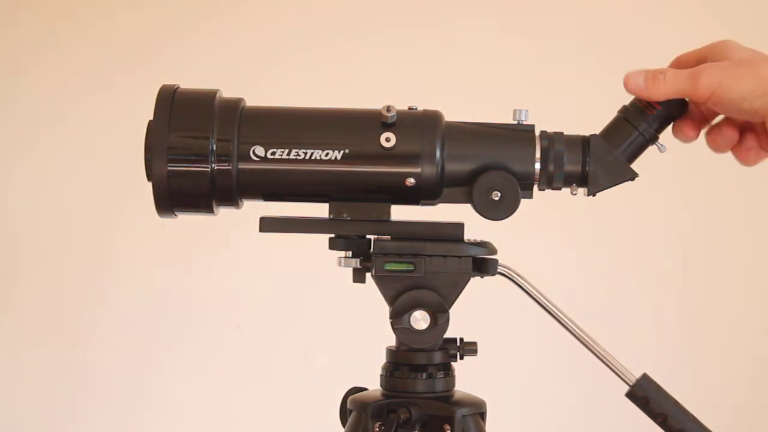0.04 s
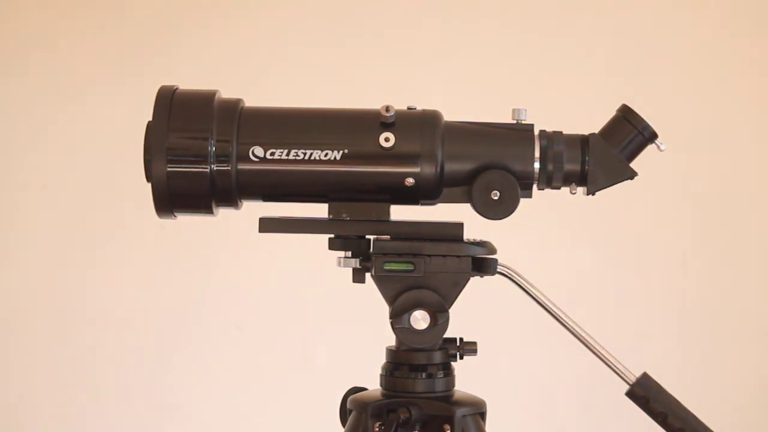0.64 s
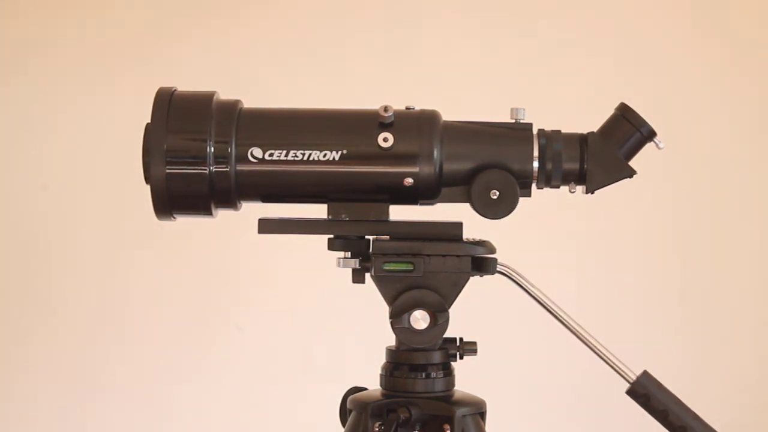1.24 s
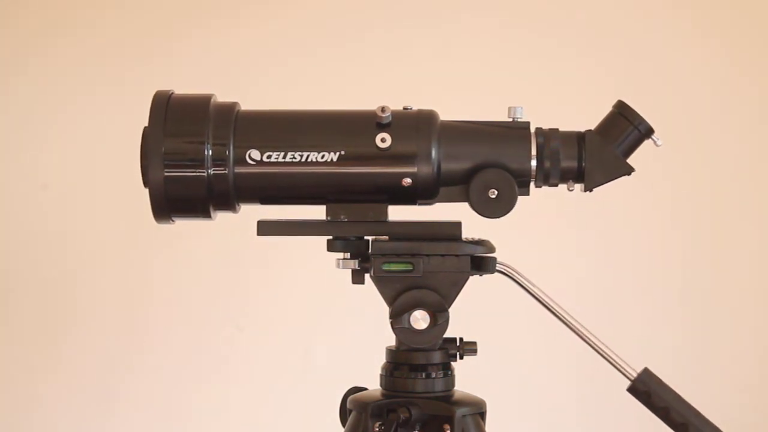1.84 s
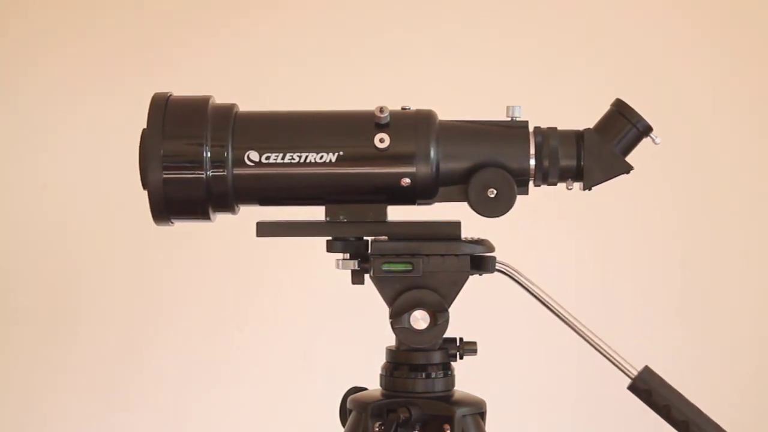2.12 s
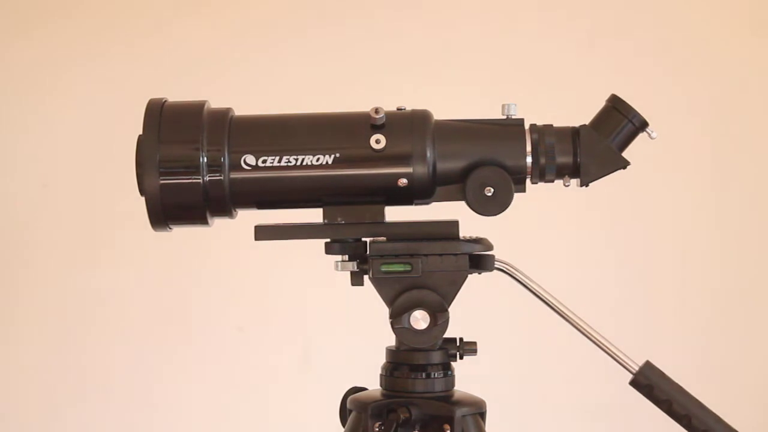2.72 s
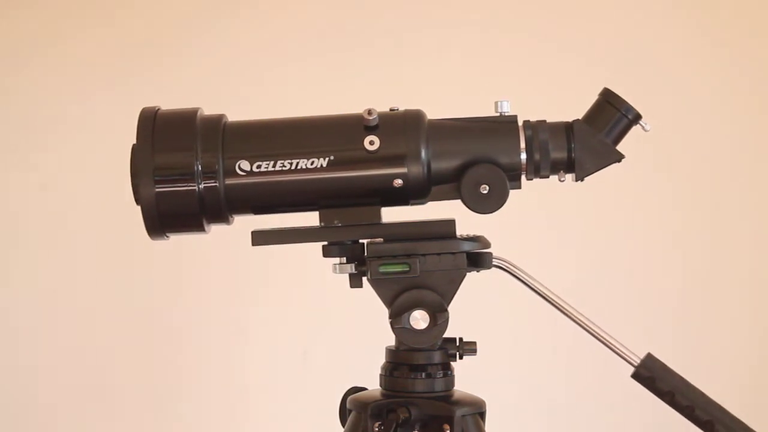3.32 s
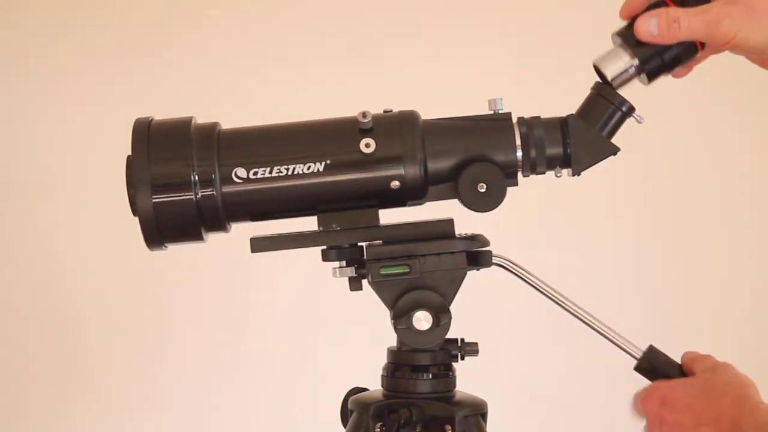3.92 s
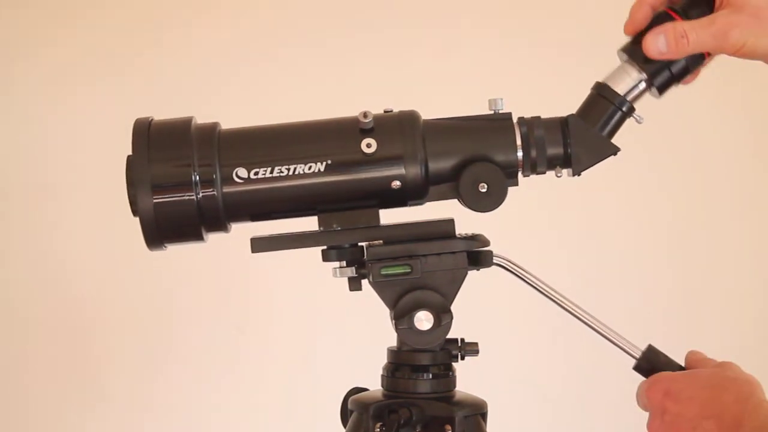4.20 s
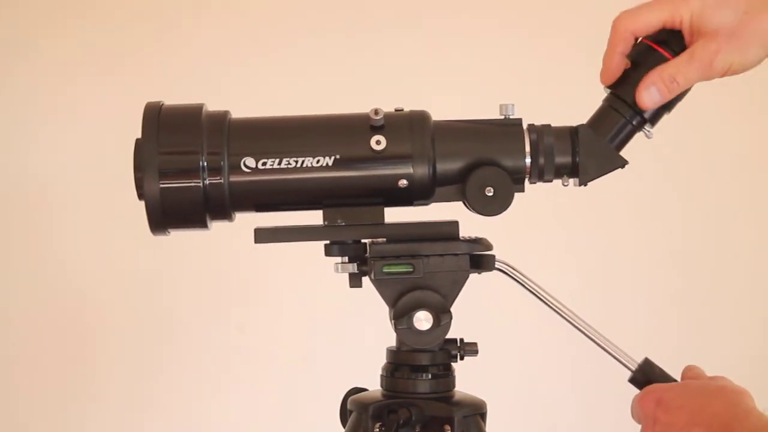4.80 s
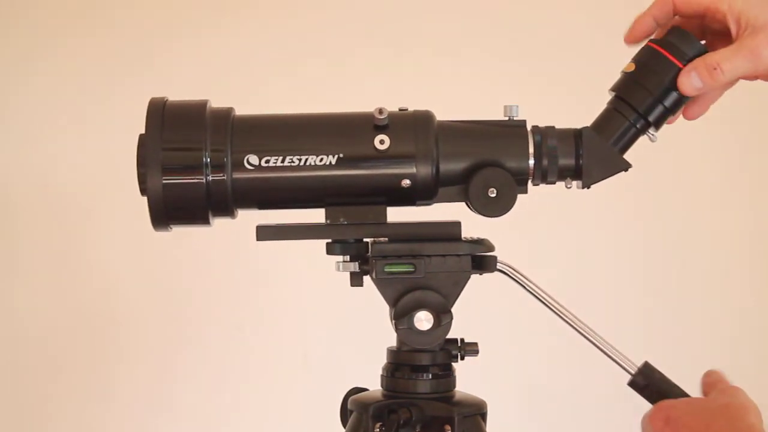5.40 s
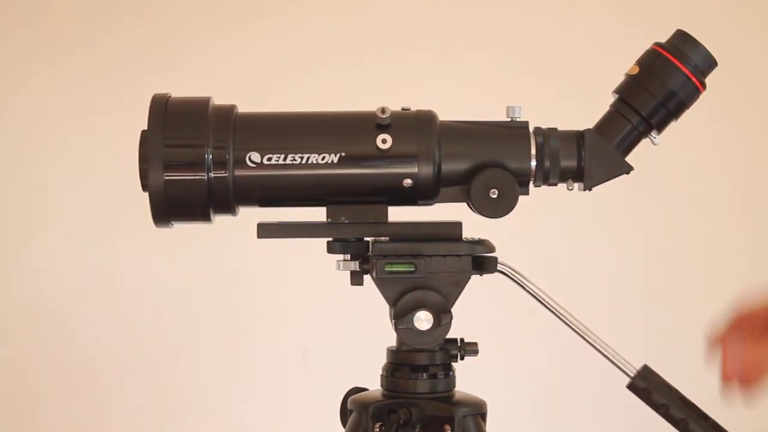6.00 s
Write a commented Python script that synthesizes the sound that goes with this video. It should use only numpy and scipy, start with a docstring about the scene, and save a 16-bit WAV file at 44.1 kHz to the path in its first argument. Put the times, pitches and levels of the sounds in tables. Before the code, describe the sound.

A metal eyepiece pings out of a small telescope, knocks sound on a table, a cap snaps off, and another eyepiece clacks in.

```python
"""An eyepiece is swapped on a small spotting scope in a bare, quiet room.
The old one zips out of its holder, grooves rubbing the rim, pings free and is set on a table.
The new one knocks on the table; its plastic cap is gripped, dragged and snaps off.
A hand takes the tripod handle, then the new barrel taps the rim, slides in and seats with a clack.
A sleeve and fingers rustle in between, over steady hiss and hum."""
import sys
import numpy as np
from scipy import signal
from scipy.fft import rfft, irfft
from scipy.io import wavfile
from scipy.ndimage import uniform_filter1d

SR = 44100
rng = np.random.default_rng(int(sys.argv[2]) if len(sys.argv) > 2 else 0)


def bounce(signal):
    """Save signal as a 16-bit WAV file at the path given by the first command-line argument."""
    frames = np.transpose(np.atleast_2d(signal))
    limited = np.clip(frames, -1, 1)
    pcm = np.round(limited * 32767).astype(np.int16)
    wavfile.write(sys.argv[1], SR, pcm)


N = 266849
TIME_S = np.arange(N) / SR
AGE_S = TIME_S[:SR // 2]   # time axis of an impulse response
CUTOFF_HZ = 15900


# Slide: start and end in seconds, first and last groove rate in Hz, full-speed level in dB.
PULL_SLIDE = (.243, .368, 1150, 5400, -52.5)
# Strokes. Each row: peak time in seconds, length in seconds, peak level in dB.
BARREL_STROKES = [(.346, 0.07, -54), (.364, 0.024, -43.5)]
# Contacts. Each row: start in seconds, level in dB, brightness in Hz.
PING_HITS = [(.364, -14.5, 15000)]
RELEASE_HITS = [(.368, -23, 3000), (.373, -13.5, 2500)]
# Spectra. Each row: frequency in Hz, relative gain in dB.
BARREL_EQ = [(1500, -5), (1900, -5), (2600, -8), (4300, -3), (5200, -13), (6150, 1), (7500, -10),
             (9000, -13), (10400, -6), (11800, -23.8), (15000, -28)]
RELEASE_EQ = [(120, -30), (200, -13), (395, -13), (463, -14), (1060, -17), (1500, -32), (1780, -21),
              (3000, -34), (3900, -57), (6600, -120)]
# Modes. Each row: frequency in Hz, relative level in dB, T60 in seconds.
BARREL_RING = [(1860, -10, .2), (3354, -9, .2), (4210, -5, .22), (4393, -3, .22), (6083, 0, .26),
               (6170, -4, .22), (6616, -14, .3), (9679, -10, .17), (9792, -12, .15), (10720, -7, .2)]
HOLDER_RING = [(280, -5, 0.14), (408, -2, 0.12), (512, 4, 0.13), (924, -2, .15)]

def pull_out():
    """The old barrel rubs out of the holder and pings as it comes free with a small pop."""
    slide = groove_zip(PULL_SLIDE, hiss_db=-5.5, db_per_doubling=2)
    rub = through(friction(BARREL_STROKES, grit_db=3), body(BARREL_EQ, crack_db=0, crack_s=0.0017))
    ping = ringing(PING_HITS, BARREL_RING)
    pop = strike(RELEASE_HITS, RELEASE_EQ, crack_db=-0.65, crack_s=0.0026, modes=HOLDER_RING, ring_db=0)
    return slide + rub + ping + pop


# Contacts. Each row: start in seconds, level in dB, brightness in Hz.
SET_DOWN_HITS = [(1.3475, -2.5, 12000), (1.3507, 0, 12000), (1.3565, 6, 14000), (1.368, 0.5, 1200)]
# Spectrum. Each row: frequency in Hz, relative gain in dB.
SET_DOWN_EQ = [(70, -21), (160, -7.5), (220, -1.5), (400, -7), (600, -4), (1000, -7.5), (1300, -11),
               (2100, -12), (2900, -8), (5400, -10.5), (6700, -26.5), (8000, -20.5), (9000, -37),
               (16000, -44)]
# Modes. Each row: frequency in Hz, relative level in dB, T60 in seconds.
SET_DOWN_RING = [(169, -2.9, 0.25), (237, -0.2, 0.26), (408, -2.5, 0.23), (497, -8.9, 0.31),
                 (551, -5.7, 0.23), (580, -4.3, 0.21), (639, -3.6, 0.18), (909, -7.6, 0.29),
                 (1075, -10.1, 0.32), (1428, -13.6, 0.36), (2489, -11.5, 0.28), (2544, -9.6, 0.28),
                 (2696, -14.2, 0.33), (2857, -12.6, 0.36), (3062, -7.5, 0.35), (3249, -13.3, 0.34),
                 (3626, -10.9, 0.3), (3982, -11.8, 0.19), (4328, -12.4, 0.22), (5215, -12.0, 0.25),
                 (5524, -12.0, 0.2)]

def set_down():
    """The old eyepiece clatters onto the table; eyepiece, table and room ring."""
    clatter = strike(SET_DOWN_HITS, SET_DOWN_EQ, crack_db=-0.31, crack_s=0.0038)
    return clatter + from_db(-2.5) * ringing(SET_DOWN_HITS, SET_DOWN_RING)


# Contacts. Each row: start in seconds, level in dB, brightness in Hz.
NUDGE_HITS = [(1.5805, -8, 6000), (1.584, -14.5, 5000)]
TICK_HITS = [(1.7045, -15, 15000)]
KNOCK_HITS = [(1.722, -3, 6000), (1.724, 6, 3500), (1.7255, 12.2, 9000), (1.7355, 8, 9000)]
# Spectra. Each row: frequency in Hz, relative gain in dB.
NUDGE_EQ = [(300, -5.5), (600, -3.5), (900, -1), (1600, 1.5), (2400, -4.5), (3500, -13), (4500, -27.9),
            (6000, -28)]
TICK_EQ = [(1500, -17), (3100, 4), (4200, -3), (5500, -23), (7700, -11), (8700, -24), (9900, -7),
           (13000, -20)]
KNOCK_EQ = [(60, -24), (100, -22), (160, -4.5), (300, -2.5), (450, -0.3), (700, -1.5), (1200, 1),
            (1900, -6), (2300, -10), (3300, -15), (5000, -29), (8500, -33), (10000, -31.5), (14500, -45)]
# Modes. Each row: frequency in Hz, relative level in dB, T60 in seconds.
TABLE_AND_ROOM_RING = [(167, -13.3, 0.21), (271, -8.6, 0.29), (399, -3.5, 0.18), (469, -12.2, 0.26),
                       (497, -8.9, 0.31), (578, -6.5, 0.35), (621, -3.4, 0.28), (681, -3.2, 0.21),
                       (746, -3.9, 0.3), (866, -12.4, 0.27), (1014, -1.5, 0.22), (1037, -8.8, 0.24),
                       (1110, -13.9, 0.31), (1152, -4.8, 0.24), (1174, -0.2, 0.26), (1211, -3.1, 0.25),
                       (1293, -2.7, 0.29), (1427, -12.6, 0.36), (1494, -13.7, 0.3), (1596, -14.6, 0.36),
                       (1619, -13.6, 0.36), (1686, -12.8, 0.3), (1742, -10.7, 0.23), (1773, -12.9, 0.31),
                       (1837, -15.6, 0.36), (1882, -6.8, 0.19), (2050, -12.6, 0.23), (2624, -17.3, 0.34)]

def table_knock():
    """The new eyepiece is nudged, ticks and knocks; the table top radiates the blow ahead of the room."""
    nudge = strike(NUDGE_HITS, NUDGE_EQ, crack_db=-21, crack_s=0.003)
    tick = strike(TICK_HITS, TICK_EQ, crack_db=-9, crack_s=0.0023)
    knock = from_db(0.5) * strike(KNOCK_HITS, KNOCK_EQ, crack_db=-21, crack_s=0.0033)
    direct = from_db(-3.5) * through(blows(KNOCK_HITS), colour(KNOCK_EQ))
    table_and_room = from_db(2.5) * ringing(KNOCK_HITS, TABLE_AND_ROOM_RING)
    return nudge + tick + knock + direct + table_and_room


# Strokes. Each row: peak time in seconds, length in seconds, peak level in dB.
GRIP_STROKES = [(2.1, 0.062, -46), (2.255, 0.057, -56.5), (2.412, .022, -44.5)]
DRAG_STROKES = [(2.43, 0.026, -29), (2.455, 0.03, -25.5)]
# Contact. Each row: start in seconds, level in dB, brightness in Hz.
SNAP_HITS = [(2.447, -4.5, 12000)]
# Spectra. Each row: frequency in Hz, relative gain in dB.
GRIP_EQ = [(600, -6), (1550, -4), (2300, -12), (2900, -8), (3400, -16), (4000, -1), (4900, -24), (6500, -7),
           (7200, -15), (8200, -8), (10500, -25), (12500, -19), (15000, -34)]
CAP_EQ = [(300, -23), (700, -11), (1100, -13.5), (1500, -4), (2200, -7), (2650, 0.5), (3600, -8),
          (4600, -15.5), (7500, -16.5), (9000, -25), (10300, -43), (11800, -31), (16000, -51)]
# Modes. Each row: frequency in Hz, relative level in dB, T60 in seconds.
CAP_RING = [(1529, -6, .26), (1755, -9, .35), (2455, -1, .39), (2590, 1, .38), (2660, -2, .36),
            (2799, -3, .42), (5776, -16, .3), (7623, -16, .23)]

def cap_off():
    """The plastic cap is gripped, dragged and snaps off, ringing."""
    grip = through(friction(GRIP_STROKES, grit_db=7), body(GRIP_EQ, crack_db=-2.5, crack_s=0.0017))
    force = friction(DRAG_STROKES, grit_db=6.5) + blows(SNAP_HITS)
    cap = body(CAP_EQ, crack_db=-0.28, crack_s=0.0029, modes=CAP_RING, ring_db=-13.5)
    return grip + through(force, cap)


# Slide: start and end in seconds, first and last groove rate in Hz, full-speed level in dB.
PUSH_SLIDE = (4.706, 4.772, 1400, 11300, -42)
# Contacts. Each row: start in seconds, level in dB, brightness in Hz.
HANDLE_HITS = [(3.914, -15, 12000), (3.918, -4, 15000)]
RIM_HITS = [(4.2385, -17, 12000), (4.2475, -3, 15000)]
SEAT_HITS = [(4.139, -16.5, 9200), (4.142, -20.5, 12000), (4.7732, -0.5, 15000), (4.7797, 9.5, 13000)]
# Spectra. Each row: frequency in Hz, relative gain in dB.
HANDLE_EQ = [(100, -40), (170, -26), (218, 4), (371, -20), (440, -4.5), (793, -1), (889, -1), (1080, -4.5),
             (1830, -4), (3180, -7.5), (6300, -5.5), (12300, -16), (16000, -32)]
RIM_EQ = [(300, -21), (450, -9.5), (800, -3), (1300, -10), (1900, -7), (2700, -11), (3900, -3),
          (5400, -17.5), (6500, 2.5), (7400, -6.5), (8700, -15.5), (10600, -12), (12500, -25.8),
          (16000, -27)]
SEAT_EQ = [(130, -16), (260, -10), (440, -2), (600, -7.5), (1100, -0.5), (1800, -0.5), (2800, -3),
           (4500, -4.5), (7500, -6), (11000, -12), (14000, -16), (16000, -27)]
# Modes. Each row: frequency in Hz, relative level in dB, T60 in seconds.
RIM_RING = [(3430, -14, 0.36), (3820, -10, 0.17), (6444, -15, 0.36), (7200, -2, 0.12), (7900, -12, 0.1),
            (10100, -10, 0.12)]
SCOPE_RING = [(436, 0.1, 0.25), (1016, -1.7, 0.18), (1294, -2.4, 0.22), (1683, -1.6, 0.23),
              (1826, -2.8, 0.24), (1902, -4.7, 0.24), (1945, -5.1, 0.26), (1980, -6.0, 0.25),
              (2355, -6.0, 0.31), (2417, -8.1, 0.26), (2790, -2.4, 0.22), (2826, -8.2, 0.33),
              (3273, -7.8, 0.3), (3310, -6.1, 0.2), (3554, -6.4, 0.22), (3939, -2.9, 0.24),
              (4681, -8.7, 0.23), (5089, -4.3, 0.17)]

def push_in():
    """The tripod handle clicks; the new barrel taps the rim, slides in and seats, ringing the scope."""
    handle = strike(HANDLE_HITS, HANDLE_EQ, crack_db=1, crack_s=0.011)
    rim = strike(RIM_HITS, RIM_EQ, crack_db=1.7, crack_s=0.0032, modes=RIM_RING, ring_db=-12)
    slide = groove_zip(PUSH_SLIDE, hiss_db=0, db_per_doubling=6)
    clack = strike(SEAT_HITS, SEAT_EQ, crack_db=1.8, crack_s=0.0087)
    scope = from_db(-11.5) * ringing(SEAT_HITS, SCOPE_RING)
    return handle + rim + slide + clack + scope


# Sliding hiss spectrum. Each row: frequency in Hz, relative gain in dB.
SLIDE_EQ = [(800, 2), (2000, 0), (7000, -1.5), (10500, -10), (15000, -22)]

def groove_zip(slide, hiss_db, db_per_doubling, fade_s=0.018):
    """Fine grooves on the barrel pass the rim; it speeds up steadily, so pitch and level rise."""
    start_s, end_s, first_hz, last_hz, db = slide
    rate_hz = np.interp(TIME_S, [start_s, end_s], [first_hz, last_hz])
    touching = np.clip(np.minimum(TIME_S - start_s, end_s - TIME_S) / fade_s, 0, 1)
    gain = touching * from_db(db + db_per_doubling * np.log2(rate_hz / last_hz))
    jittered_hz = rate_hz * (1 + 0.07 * waver(2500))
    grooves = gain * np.sin(2 * np.pi * np.cumsum(jittered_hz) / SR)
    hiss = from_db(hiss_db) * through(slipping(gain, grit_db=3), colour(SLIDE_EQ))
    room = unit_energy(signal.unit_impulse(len(AGE_S)) + room_tail())
    return through(grooves + hiss, room)


# Contacts. Each row: start in seconds, level in dB, brightness in Hz.
BUMP_HITS = [(2.875, -23.5, 900), (4.141, -17.5, 1510), (4.25, -19.5, 1500), (5.535, -27.5, 895)]
# Spectrum. Each row: frequency in Hz, relative gain in dB.
BUMP_EQ = [(120, -1), (210, 1), (450, 8), (700, 4), (2000, -62)]
# Modes. Each row: frequency in Hz, relative level in dB, T60 in seconds.
MOUNT_RING = [(208, 11.7, 0.2), (232, 3, 0.33), (437.3, 8.3, 0.27)]

def mount_bumps():
    """Soft bumps excite the low modes of the mount."""
    return strike(BUMP_HITS, BUMP_EQ, crack_db=-1, crack_s=0.0022, modes=MOUNT_RING, ring_db=1.5)


# Strokes. Each row: peak time in seconds, length in seconds, peak level in dB.
SLEEVE_STROKES = [(2.74, 0.2, -55.5), (2.86, 0.27, -56.5), (3.17, 0.59, -59.5), (3.35, .24, -63),
                  (3.75, 1, -61.5), (4.57, .36, -62.5), (5.92, 0.38, -63.5)]
FINGER_STROKES = [(.045, 0.048, -63), (.76, 0.42, -69), (2.7, 0.084, -59.5), (2.86, .3, -69),
                  (3.05, 0.083, -60.5), (3.57, 0.78, -66), (4.58, .08, -61)]
# Spectra. Each row: frequency in Hz, relative gain in dB.
SLEEVE_EQ = [(150, -13), (300, 1), (700, -2.5), (1500, 1.5), (3000, -7.5), (6000, -18.5), (12000, -42)]
FINGER_EQ = [(1000, -30), (3500, 2), (7000, 0), (12000, -10.5), (16000, -10)]

def hands():
    """A sleeve rustles and fingers shift on the housing."""
    sleeve_slips = friction(SLEEVE_STROKES, grit_db=6)
    finger_slips = friction(FINGER_STROKES, grit_db=6)
    sleeve = through(sleeve_slips, body(SLEEVE_EQ, crack_db=-7, crack_s=0.0022))
    fingers = through(finger_slips, body(FINGER_EQ, crack_db=0, crack_s=0.0037))
    return sleeve + fingers


def strike(hits, spectrum, **body_settings):
    """Contact pulses drive one object in the room."""
    return through(blows(hits), body(spectrum, **body_settings))


def blows(hits, size=256):
    """One force pulse per contact; softer contacts last longer and sound duller."""
    force = np.zeros(N)
    for start_s, db, bright_hz in hits:
        lowpass = signal.butter(2, bright_hz, fs=SR)
        start = round(start_s * SR)
        force[start:start + size] += from_db(db) * signal.lfilter(*lowpass, signal.unit_impulse(size))
    return force


def ringing(hits, modes):
    """The hardest contact sets the given modes ringing, of object or room."""
    hardest = max(hits, key=lambda hit: hit[1])
    return through(blows([hardest]), ring(modes))


def ring(modes, swell_s=0.00092):
    """Decaying sines that swell as the blow spreads."""
    sines = sum((-1) ** k * from_db(db - 60 * AGE_S / t60_s) * np.sin(2 * np.pi * hz * AGE_S)
                for k, (hz, db, t60_s) in enumerate(modes))
    return unit_energy(sines * (1 - np.exp(-AGE_S / swell_s)))


def body(spectrum, crack_db, crack_s, modes=None, ring_db=-6):
    """Response of an object in the room: a short crack, its reflections and any ringing modes."""
    crack = unit_energy(rng.standard_normal(len(AGE_S)) * np.exp(-AGE_S / crack_s))
    flat = evened(from_db(crack_db) * crack + room_tail())
    response = unit_energy(through(flat, colour(spectrum)))
    return unit_energy(response + from_db(ring_db) * ring(modes)) if modes else response


def friction(strokes, grit_db, rise_share=0.49):
    """Slips follow the pressure of each stroke, which builds to a peak and lets go."""
    corners = [-rise_share, 0, 1 - rise_share]
    pressure = sum(from_db(db) * np.interp((TIME_S - peak_s) / length_s, corners, [0, 1, 0])
                   for peak_s, length_s, db in strokes)
    return slipping(pressure, grit_db)


def slipping(gain, grit_db):
    """Countless tiny slips of uneven size."""
    slips = rng.standard_normal(N) * from_db(grit_db * np.tanh(waver(900)))
    return gain * slips / np.std(slips)


# Reverberation. Each row: frequency in Hz, T60 in seconds.
ROOM_DECAY = [(100, 0.25), (300, 0.36), (800, 0.32), (2000, 0.32), (5000, 0.27), (9000, 0.24),
              (15000, 0.13)]

def room_tail(build_s=0.0018, size=32768, bands=8):
    """Dense reflections that build up quickly and die band by band."""
    hz = np.fft.rfftfreq(size, 1 / SR)
    white = rfft(rng.standard_normal(size))
    centres_hz = np.geomspace(100, CUTOFF_HZ, bands)
    tail = 0
    for centre_hz, share in zip(centres_hz, np.eye(bands)):
        band = irfft(white * at_hz(np.c_[centres_hz, share], hz))[:len(AGE_S)]
        tail = tail + band * from_db(-60 * AGE_S / at_hz(ROOM_DECAY, centre_hz))
    return unit_energy(tail * (1 - np.exp(-AGE_S / build_s)))


# Room hiss spectrum. Each row: frequency in Hz, relative gain in dB.
AIR_EQ = [(25, -19), (40, -6), (65, 0.5), (100, -0.5), (140, -9), (200, -1.5), (310, 1), (500, -4),
          (850, -6.5), (1500, -7), (2500, -12.5), (5000, -17.5), (9000, -22.5), (16000, -30)]
# Hum. Each row: frequency in Hz, RMS level in dB.
HUM_LINES = [(50, -87), (62, -95), (88, -73), (102.3, -66), (306.8, -71), (344.5, -81.5)]

def background(hiss_db=-58):
    """Steady room hiss with mains and appliance hum."""
    hum = sum(from_db(db) * np.sqrt(2) * np.sin(2 * np.pi * (hz * TIME_S + rng.random()))
              for hz, db in HUM_LINES)
    return hum + from_db(hiss_db) * through(rng.standard_normal(N), colour(AIR_EQ))


def from_db(db):
    """Decibels to gain."""
    return 10 ** (np.asarray(db) / 20)


def unit_energy(x):
    """Scale a response to unit energy."""
    return x / np.sqrt(np.sum(x ** 2) + 1e-20)


def at_hz(points, hz):
    """Read a table on a log-frequency axis."""
    known_hz, values = np.transpose(points)
    return np.interp(np.log(hz + 1e-3), np.log(known_hz), values)


def through(x, response):
    """Convolve, keeping the input length."""
    return signal.oaconvolve(x, response)[:len(x)]


def waver(rate_hz):
    """Interpolated noise with a spread near one."""
    return np.interp(TIME_S * rate_hz, np.arange(N), rng.standard_normal(N))


def minimum_phase(gain_db):
    """The most compact causal response with these gains."""
    cepstrum = irfft(gain_db * np.log(10) / 20)
    half = len(cepstrum) // 2
    folded = np.r_[cepstrum[0], 2 * cepstrum[1:half], np.zeros(half)]
    return irfft(np.exp(rfft(folded)))


def colour(spectrum, size=4096):
    """Response with a given spectrum, falling 20 dB an octave for two octaves past its ends."""
    hz = np.fft.rfftfreq(size, 1 / SR) + 1
    octaves_outside = np.abs(np.log2(hz / np.clip(hz, spectrum[0][0], spectrum[-1][0])))
    return unit_energy(minimum_phase(at_hz(spectrum, hz) - 20 * np.minimum(octaves_outside, 2)))


def evened(response, size=32768, smooth_bins=110):
    """Flatten the broad colour; keep the fine peaks and dips."""
    broad_power = uniform_filter1d(np.abs(rfft(response, size)) ** 2, size=smooth_bins)
    return unit_energy(through(response, minimum_phase(-10 * np.log10(broad_power + 1e-12))))


# Standing waves between the walls. Each row: frequency in Hz, gain in dB.
WALL_EQ = [(50, -2), (100, 1), (168, 4), (200, -9), (240, 2), (315, -3), (400, 5), (520, 0)]

def scene():
    """All sources at one microphone, coloured by standing waves, over the background."""
    sources = pull_out() + set_down() + table_knock() + cap_off() + push_in() + mount_bumps() + hands()
    walls = minimum_phase(at_hz(WALL_EQ, np.fft.rfftfreq(len(AGE_S), 1 / SR)))
    return (through(sources, walls) + background())[None]


def record(dry):
    """A steep low-pass cuts the top treble."""
    return signal.sosfilt(signal.ellip(10, .1, 80, CUTOFF_HZ, fs=SR, output="sos"), dry)


dry = scene()
out = record(dry)
bounce(out)
```